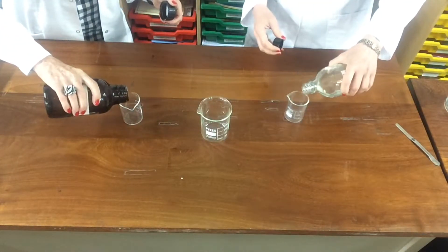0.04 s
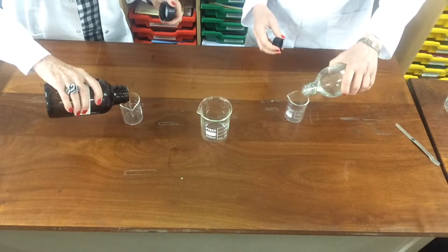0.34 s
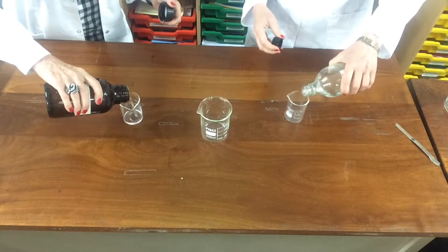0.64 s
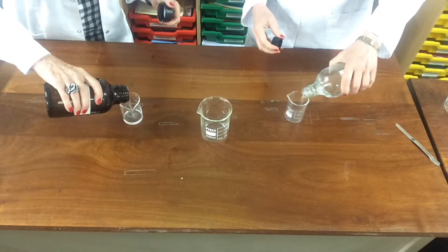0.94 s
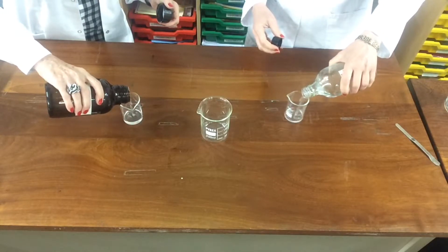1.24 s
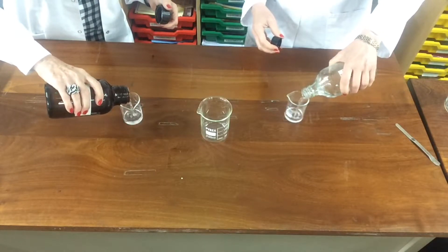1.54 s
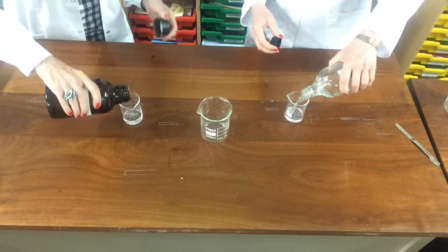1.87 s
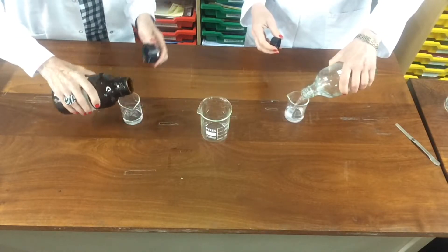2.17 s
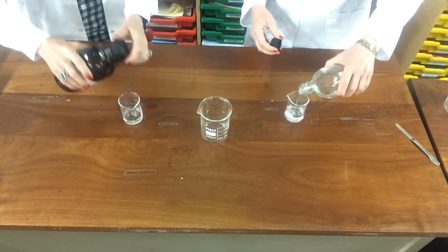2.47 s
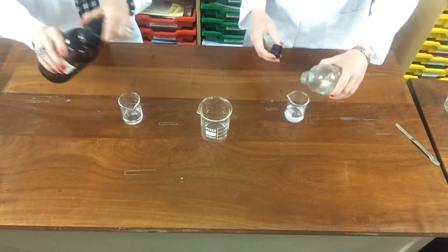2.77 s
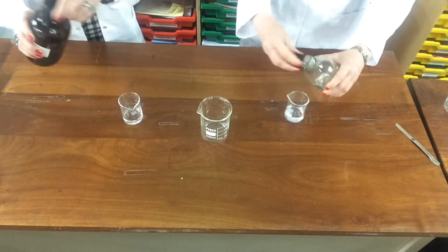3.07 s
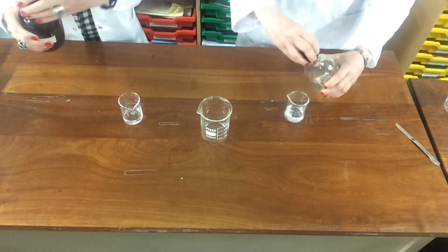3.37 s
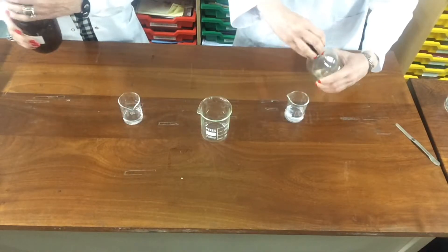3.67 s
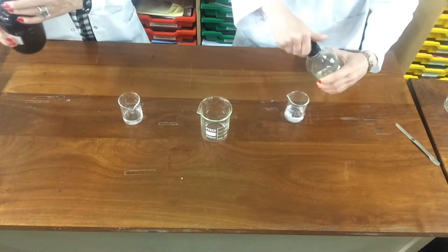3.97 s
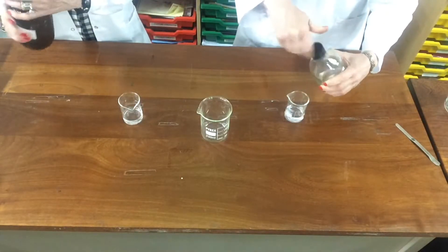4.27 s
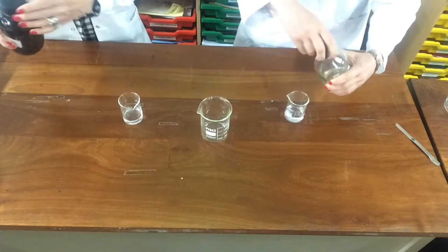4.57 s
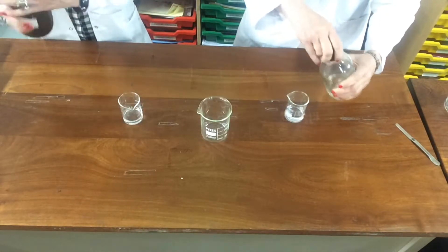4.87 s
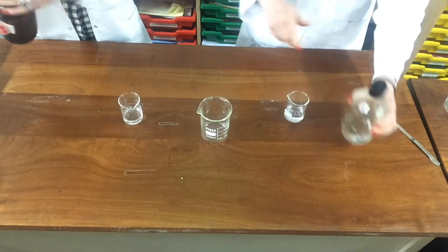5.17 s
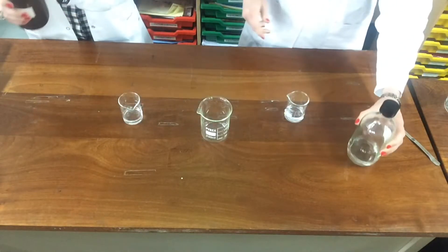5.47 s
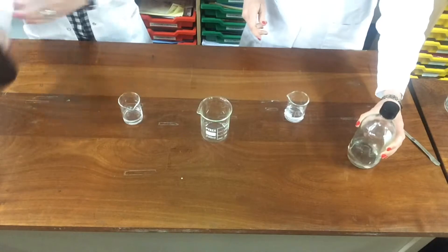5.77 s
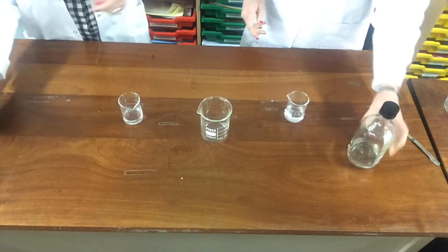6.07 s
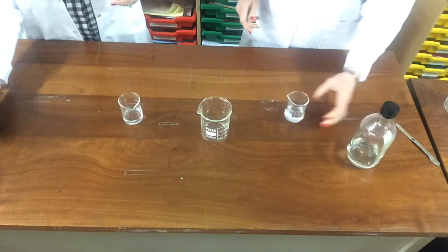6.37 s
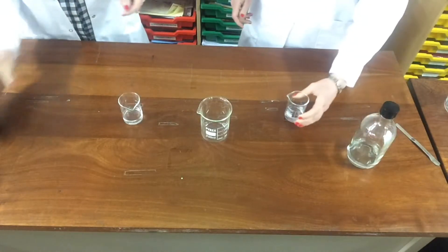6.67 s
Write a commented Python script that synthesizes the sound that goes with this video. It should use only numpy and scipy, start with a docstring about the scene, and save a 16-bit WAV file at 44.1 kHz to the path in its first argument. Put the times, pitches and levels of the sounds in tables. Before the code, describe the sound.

A faint low rumble and hiss fill a classroom lab with a short echo. From about 0.8 to 2.4 seconds, liquid trickles quietly from glass bottles into small beakers, with small splashes, a thin fizz and bubbly plinks, clearest around 1.7 seconds. From 2.4 to 3.7 seconds, plastic caps click and tap against the bottle necks, with brief scrapes and a few soft, hollow pops. Between 3.9 and 4.7 seconds a cap rubs on its thread, skidding on the glass with tiny squeaks and a stutter of bright snaps. A few light clicks follow just after 5 seconds. At 5.6 seconds a bottle lands on the wooden bench with a loud, resonant thud, leaving glassware ringing faintly. Another thud comes at 6.2 seconds, followed by a glassy tick and several quick knocks until about 6.5 seconds.

```python
"""Liquid poured from glass bottles into small beakers by two people at a wooden classroom lab bench.
Drops splash and trap air bubbles that plink; thin streams fizz. Plastic caps click on the necks, pop
and rub on their threads; one skids, squeaks and stutters on the glass. The bottles are set down with
thuds that ring the bench and nearby glassware. Short room echoes, low rumble and hiss lie beneath."""
import sys
import numpy as np
from scipy import signal
from scipy.fft import rfft, irfft
from scipy.io import wavfile
from scipy.ndimage import uniform_filter1d

SR = 44100
rng = np.random.default_rng(int(sys.argv[2]) if len(sys.argv) > 2 else 0)


def wav_out(sig):
    """Save sig, one row per channel (or a flat mono array), as 16-bit PCM at SR to the path in sys.argv[1]."""
    wavfile.write(sys.argv[1], SR, np.round(np.clip(np.atleast_2d(sig).T, -1, 1) * 32767).astype(np.int16))


N = 301070
TIME = np.arange(N) / SR
RING_TIME = np.arange(SR // 2) / SR
HZ = np.maximum(np.fft.rfftfreq(4096, 1 / SR), 1)


def amp(db):
    """Decibels to gain."""
    return 10 ** (np.asarray(db) / 20)


def unit_rms(x):
    """Scale to rms 1."""
    return x / np.sqrt(np.mean(x ** 2) + 1e-20)


def peak_rms(x):
    """Rms of the loudest 4 ms."""
    return np.sqrt(uniform_filter1d(x ** 2, 176).max() + 1e-20)


def unit_peak(x):
    """Scale the loudest 4 ms to rms 1."""
    return x / peak_rms(x)


def add(mix, start_s, sound):
    """Mix a sound in at start_s."""
    part = mix[max(round(start_s * SR), 0):][:len(sound)]
    part += sound[:len(part)]


def curve(points, hz=HZ):
    """Interpolate (Hz, value) points over log frequency."""
    point_hz, value = np.transpose(points)
    return np.interp(np.log(hz + 1), np.log(point_hz + 1), value)


def hump(hz, height_db, octaves=.12):
    """Resonant peak round hz, in dB over HZ."""
    return height_db / (1 + (np.log2(HZ / hz) / octaves) ** 2)


def colour(x, gain_db):
    """Minimum-phase filter, gain_db given over HZ."""
    log_gain = np.log(amp(np.maximum(gain_db, gain_db.max() - 100)))
    mirrored = np.concatenate([log_gain, log_gain[-2:0:-1]])
    taps = np.fft.ifft(np.exp(np.conj(signal.hilbert(mirrored)))).real
    return signal.oaconvolve(x, taps)[:len(x)]


def noise(spectrum):
    """Steady shaped noise, rms 1."""
    gain = amp(curve(spectrum, np.fft.rfftfreq(N, 1 / SR)))
    return unit_rms(irfft(rfft(rng.standard_normal(N)) * gain, N))


def ring(modes, spread_db):
    """Decaying modes; the place of the blow stirs each a little more or less."""
    hz, db, t60_s = np.transpose(modes)[:, :, None]
    weight = amp(db + spread_db * rng.standard_normal(db.shape)) * rng.choice([-1, 1], db.shape)
    return (weight * amp(-60 * RING_TIME / t60_s) * np.sin(2 * np.pi * hz * RING_TIME)).sum(0)


def crack(fall_s, scatter):
    """An impulse, then the dense, fast-dying shudder of the struck body."""
    shudder = rng.standard_normal(len(RING_TIME)) * np.exp(-RING_TIME / fall_s)
    return signal.unit_impulse(len(RING_TIME)) + scatter * shudder / np.linalg.norm(shudder)


def blips(rows, glide):
    """Brief tones that swell and die, drifting by the fraction glide in pitch."""
    out = np.zeros(N)
    for start_s, hz, db, swell_s in rows:
        age = RING_TIME / swell_s
        turns = np.cumsum(hz * (1 + glide * (np.tanh(age) - .5))) / SR
        swell = age * np.exp(-age ** 2 / 2)
        add(out, start_s, amp(db) * swell / swell.max() * np.sin(2 * np.pi * turns))
    return out


# Room noise spectra. Each row: frequency in Hz, relative density in dB.
RUMBLE_SPECTRUM = [(12, -39), (20, -17.5), (81, -0.5), (142, -10), (301, -18), (590, -27.5), (1030, -31.5),
                   (2020, -40), (2320, -82), (2820, -73), (16000, -48.5)]
HISS_SPECTRUM = [(150, -27), (400, 7), (1000, 2.5), (2000, 1), (4000, -4.5), (7500, -8), (10000, -12),
                 (15000, -16.5)]
# Slow drift of the rumble's bass and of the hiss. Each row: time in seconds, gain in dB.
BASS_DRIFT = [(0, -3), (.9, 1.6), (4.5, -2.5), (5.3, -7), (6.83, -5.5)]
HISS_DRIFT = [(0, -76), (1.3, -76.5), (2.25, -65), (3.6, -69.5), (4.8, -66.5), (6.83, -65)]

def background(rumble_db=-60.5, waver_db=3, bass_hz=170, hum_hz=299, hum_db=-72):
    """Lumpy room rumble, a faint hum, and a hiss that grows late in the pouring."""
    knots_s = np.arange(0, N / SR + 1, 0.1)
    lumps_db = waver_db * np.interp(TIME, knots_s, rng.standard_normal(len(knots_s)))
    bass_gain = amp(lumps_db + np.interp(TIME, *np.transpose(BASS_DRIFT)))
    steady = noise(RUMBLE_SPECTRUM)
    bass = signal.sosfiltfilt(signal.butter(2, bass_hz, fs=SR, output="sos"), steady)
    rumble = amp(rumble_db) * (steady - bass + bass_gain * bass)
    hum = amp(hum_db) * np.sin(2 * np.pi * hum_hz * TIME)
    hiss = amp(np.interp(TIME, *np.transpose(HISS_DRIFT))) * noise(HISS_SPECTRUM)
    return rumble + hum + hiss


# Tick of a splash or a cap contact. Each row: frequency in Hz, gain in dB.
TICK_SPECTRUM = [(100, -33), (300, -6), (700, 0.5), (1300, 3.5), (2200, 0), (4200, 2.5), (5500, -4.5),
                 (8200, -2), (11000, -8.5), (15500, -20)]
# Drops. Each row: start in seconds, bubble pitch in Hz, bubble level in dB, splash level in dB.
BEAKER_DROPS = [(.836, 5340, -45.5, -58), (0.836, 4080, -53, -62), (.891, 9420, -49, -68),
                (.900, 5400, -50.5, -55), (1.033, 3240, -53.5, -69), (1.049, 2980, -55, -61),
                (1.38, 2910, -56.5, -61), (1.471, 6760, -72, -61), (1.513, 2050, -42, -52.5),
                (1.539, 1820, -53, -48.5), (1.565, 2060, -63, -56), (1.656, 11800, -53, -65),
                (1.662, 1201, -31, -51), (1.684, 1260, -33.5, -50), (1.695, 6360, -54.5, -75),
                (1.852, 5670, -56.5, -76), (2.014, 1260, -44.5, -58), (2.051, 5640, -49.5, -60)]

def drops(swell_1khz_s=0.004, swell_law=0.43, air_hz=672, air_swell_s=0.0062, air_db_per_octave=-8):
    """Each drop slaps the liquid and traps a bubble; big, low drops stir the beaker's air most."""
    splashes = np.zeros(N)
    bubbles, beaker_air = [], []
    for start_s, hz, bubble_db, splash_db in BEAKER_DROPS:
        wet_db = curve(TICK_SPECTRUM) + hump(hz, height_db=17, octaves=0.94)
        slap = colour(crack(fall_s=0.0045, scatter=2.2), wet_db)
        add(splashes, start_s, amp(splash_db) * unit_peak(slap))
        bubbles.append((start_s, hz, bubble_db, swell_1khz_s * (1000 / hz) ** swell_law))
        air_db = splash_db + 5 + air_db_per_octave * np.log2(hz / air_hz)
        beaker_air.append((start_s, air_hz, air_db, air_swell_s))
    return splashes + blips(bubbles + beaker_air, glide=0.021)


def spray(delay_s=.022, low_hz=2600, high_hz=12500, relative_db=-7, swell_cycles=8, count=3):
    """Each splash throws up tiny bubbles that ping just after it."""
    bubbles = []
    for start_s, _, _, splash_db in BEAKER_DROPS:
        wait, size = rng.random((count, 2)).T
        times_s = start_s - delay_s * np.log(1 - wait)
        hz = low_hz * (high_hz / low_hz) ** size
        bubbles += zip(times_s, hz, np.full(count, splash_db + relative_db), swell_cycles / hz)
    return blips(bubbles, glide=0.13)


# Thin streams. Each row: start and end in seconds, bubbles per second, minimum bubble level in dB.
POUR_STREAMS = [(0.843, 1.095, 60, -66.5), (1.469, 1.878, 200, -72.5), (1.909, 2.408, 83, -67)]

def fizz(low_hz=2300, high_hz=14500, swell_cycles=6, spread_db=4):
    """Streams fold in tiny bubbles; the smaller, the higher and shorter."""
    bubbles = []
    for start_s, end_s, per_s, floor_db in POUR_STREAMS:
        length_s = end_s - start_s
        count = max(int(per_s * length_s), 1)
        when, size, strength = rng.random((count, 3)).T
        hz = low_hz * (high_hz / low_hz) ** size
        db = floor_db + spread_db * np.minimum(-np.log(1 - strength), 3)
        bubbles += zip(start_s + when * length_s, hz, db, swell_cycles / hz)
    return blips(bubbles, glide=0.2)


def glass_contacts(rows, modes, ring_db, fall_s, scatter, hump_db, cavity_db):
    """A tick coloured by the cap rings the glass, then rebounds. Harder means more treble, less body."""
    out = np.zeros(N)
    for start_s, db, hardness_db, hz in rows:
        direct = crack(fall_s, scatter)
        blow = direct.copy()
        add(blow, .0013, 0.053 * direct)  # reflection off the bench
        shelves = [(600, -14 - hardness_db), (1100, 0), (4500, 0), (8500, hardness_db)]
        tick = unit_peak(colour(blow, curve(TICK_SPECTRUM) + curve(shelves) + hump(hz, hump_db)))
        cap_cavity = (hz, cavity_db, 0.028)  # t60 in seconds
        vessel = ring(modes + [cap_cavity], spread_db=3)
        add(out, start_s, amp(db) * unit_peak(tick + amp(ring_db) * vessel))
        rebound_s = .012 * rng.uniform(.8, 1.2)
        add(out, start_s + rebound_s, amp(db - 15) * tick)
    return out


# Bottle modes. Each row: frequency in Hz, relative level in dB, t60 in seconds.
BOTTLE_MODES = [(1372, -19, 0.16), (1907, -9, 0.059), (2090, -23, 0.06), (2700, -34, 0.26),
                (3166, -9.5, 0.025), (4340, -20.5, 0.086), (4770, -27.5, 0.04), (5740, -41, 0.36)]
# Clicks. Each row: start in seconds, level in dB, hardness in dB, main pitch in Hz.
NECK_CLICKS = [(2.0145, -46.5, -29, 1370), (2.4282, -47, -15, 2700), (2.4395, -41.5, -16, 2250),
               (2.458, -41.5, -13, 2240), (2.4909, -36.5, -9, 2070), (2.595, -48, 10, 1360),
               (2.6442, -36.5, -11.5, 1820), (2.9548, -29, -10.5, 1937), (3.1598, -33, 4, 2470),
               (3.2102, -41, 0.5, 2300), (3.3159, -46, 7, 3470), (3.3247, -40, 1.5, 1840),
               (3.4177, -53.5, 4, 1470), (3.5005, -36.5, -5, 1370), (3.530, -43.5, -14.5, 1396),
               (3.6908, -38.5, -4, 2410), (3.7112, -25, -8.5, 1927), (4.6749, -40.5, -14, 1840),
               (5.0178, -46, -12, 2350), (5.2338, -41, -5.5, 4810), (5.2617, -46.5, -4, 4900)]

def clicks():
    """A cap or a beaker's rim strikes a bottle neck."""
    return glass_contacts(NECK_CLICKS, BOTTLE_MODES, ring_db=0, fall_s=0.0037, scatter=2.1,
                          hump_db=8.5, cavity_db=-1)


# Air pops. Each row: start in seconds, pitch in Hz, peak level in dB.
CAP_POPS = [(2.015, 340, -43.5), (2.617, 203, -36.5), (2.644, 230, -42), (3.222, 179, -46.5),
            (3.71, 173, -42)]

def pops(swell_cycles=1.08):
    """A sealing cap lets a puff of air out of the neck: a low, falling blip."""
    return blips([(start_s, hz, db, swell_cycles / hz) for start_s, hz, db in CAP_POPS], glide=-0.12)


# Air resonances of the neck. Each row: open and covered pitch in Hz, peak level in dB,
# then time to peak, rise and fall in seconds.
NECK_MODES = [(289, 194, -43.5, 0.059, 0.11, 0.014), (1475, 1368, -30, 0.072, 0.012, 0.013)]

def neck_air(start_s=2.438, close_s=0.079, attack_s=0.0037):
    """The air in the bottle sings downward as the cap slides over its mouth."""
    out = np.zeros(N)
    covered = np.minimum(RING_TIME / close_s, 1)
    attack = np.minimum(RING_TIME / attack_s, 1)
    for open_hz, covered_hz, db, peak_s, rise_s, fall_s in NECK_MODES:
        hz = open_hz + (covered_hz - open_hz) * covered
        swell = np.exp(np.minimum((RING_TIME - peak_s) / rise_s, (peak_s - RING_TIME) / fall_s))
        add(out, start_s, amp(db) * attack * swell * np.sin(2 * np.pi * np.cumsum(hz) / SR))
    return out


# Glass modes under rubs and snaps. Each row: frequency in Hz, relative level in dB, t60 in seconds.
GLASS_MODES = [(1973, -14, 0.053), (3220, -5, 0.048), (5360, -19, 0.043), (6380, -6, 0.074),
               (7800, -27, 0.1), (8240, -11.5, 0.058), (15100, -59, .08)]
# Friction spectrum. Each row: frequency in Hz, gain in dB.
RUB_SPECTRUM = [(200, -20), (700, 0.5), (1300, 5), (2300, 7), (3300, 2), (4500, 6), (6800, -6.5),
                (8200, -1.5), (10500, -6), (13000, -16.5), (15000, -9)]
# Strokes. Each row: peak time in seconds, level in dB, rise and fall in seconds, main pitch in Hz.
RUB_STROKES = [(2.505, -44, 0.024, 0.019, 2100), (2.624, -49.5, 0.03, 0.022, 1930),
               (3.91, -55, 0.057, 0.053, 2330), (4.019, -45.5, .024, .022, 2400),
               (4.15, -58.5, 0.065, .029, 3430), (4.286, -31.5, 0.0019, 0.025, 7950),
               (4.37, -49.5, 0.021, 0.065, 7840), (4.677, -45, 0.0016, 0.015, 1880),
               (5.012, -55, 0.032, 0.043, 1400), (5.015, -60, 0.048, .08, 13400),
               (6.234, -62.5, 0.057, .025, 7800)]

def rubs(slips_per_s=5000, grain_db=4, ring_db=-12, flat_hz=4000, lead_s=.5):
    """A cap or hand slides on a bottle: tiny slips pass through a resonance and ring the glass."""
    out = np.zeros(N)
    t = np.arange(SR) / SR - lead_s
    for peak_s, db, rise_s, fall_s, hz in RUB_STROKES:
        tilt_db_per_octave = 1.6 * np.log2(hz / flat_hz)  # faster rubs are higher and brighter
        resonance_db = hump(hz, height_db=11, octaves=0.13)
        tone_db = curve(RUB_SPECTRUM) + tilt_db_per_octave * np.log2(HZ) + resonance_db
        stroke = np.exp(np.minimum(t / rise_s, -t / fall_s))
        sizes = rng.choice([-1, 1], SR) * amp(grain_db * np.minimum(rng.exponential(1, SR), 4))
        slips = sizes * (rng.random(SR) < slips_per_s / SR)
        scrape = stroke * unit_rms(colour(slips, tone_db))
        singing = unit_rms(signal.oaconvolve(scrape, ring(GLASS_MODES, spread_db=1))[:SR])
        add(out, peak_s - lead_s, amp(db) * (scrape + amp(ring_db) * scrape.std() * singing))
    return out


# Snaps. Each row: start in seconds, level in dB, hardness in dB, main pitch in Hz.
GLASS_SNAPS = [(4.285, -29.5, 5.5, 14800), (4.3521, -36.5, 1, 7700), (4.3656, -31, -4.5, 3380),
               (4.5013, -33.5, -2, 3930), (4.504, -33, -4.5, 2020), (6.280, -38.5, 6, 12700),
               (6.282, -35.5, 0, 5100)]

def snaps(stutter_s=4.3774, gap_s=.0428, quicken_s=.0133, first_db=-37, hardness_db=-9, hz=3450):
    """Hard, bright snaps on glass; the skidding cap stutters to rest, each snap sooner and weaker."""
    stutter = []
    for k in range(4):
        start_s = stutter_s + gap_s * k - quicken_s * k * (k - 1) / 2
        stutter.append((start_s, first_db - 3 * k, hardness_db, hz))
    return glass_contacts(GLASS_SNAPS + stutter, GLASS_MODES, ring_db=-4, fall_s=0.0017, scatter=1.25,
                          hump_db=10, cavity_db=-12)


# Squeaks. Each row: start in seconds, pitch in Hz, peak level in dB, swell time in seconds.
SKID_SQUEAKS = [(4.287, 6000, -38, 0.012), (4.36, 3470, -47, 0.029), (4.503, 6370, -47, 0.0058)]

def squeaks():
    """The glass squeaks under the skidding cap."""
    return blips(SKID_SQUEAKS, glide=-0.012)


# Bench top modes. Each row: frequency in Hz, relative level in dB, t60 in seconds.
BENCH_MODES = [(98, -1.5, 0.29), (122.6, -10, 0.21), (149.5, -6.5, 0.43), (212, -13, 0.2),
               (250.5, -16, 0.46), (283.6, -17, 0.4), (330, -10, 0.48), (390, -8, 0.42), (439, -18.5, 0.46),
               (484.6, -6, 0.32), (506, -26, 0.53), (634.7, 0.5, 0.13), (675, -44, 0.28), (790, 1.5, 0.1),
               (860, -29, 0.16), (978, -38, 0.27), (1107, -36, .22), (1152, -16, 0.2)]
# Knock of glass on wood. Each row: frequency in Hz, gain in dB.
KNOCK_SPECTRUM = [(40, 8.5), (90, 5.5), (300, 2.5), (700, -1), (1400, 1.5), (2200, 1.5), (4000, 6.5),
                  (8000, 6.5), (16000, 10)]
# Landings. Each row: start in seconds, level in dB, low cutoff in Hz.
BOTTLE_LANDINGS = [(5.5677, -17, 177), (6.169, -16, 88), (6.225, -29.5, 200), (6.391, -35.5, 170),
                   (6.415, -24, 97), (6.4485, -20, 179)]

def thuds(ring_db=-6, full_blow_hz=1305, contact_law=0.31, far_edge_s=.0066, far_edge_db=-6):
    """A bottle lands on one edge, then the other: dull knocks and the boom of the bench's low modes."""
    knocks, booms = np.zeros((2, N))
    for start_s, db, low_hz in BOTTLE_LANDINGS:
        high_hz = full_blow_hz * amp(db) ** contact_law  # weaker blows are slower, so duller
        band_db = -10 * np.log10((1 + (low_hz / HZ) ** 6) * (1 + (HZ / high_hz) ** 6))
        for edge_s, edge_db in ((start_s, db), (start_s + far_edge_s, db + far_edge_db)):
            knock = unit_peak(colour(crack(fall_s=0.014, scatter=2), band_db + curve(KNOCK_SPECTRUM)))
            boom = amp(ring_db) * colour(ring(BENCH_MODES, spread_db=3), band_db)
            gain = amp(edge_db) / peak_rms(knock + boom)
            add(knocks, edge_s, gain * knock)
            add(booms, edge_s, gain * boom)
    return knocks, booms


def glassware(start_s=5.568, hz=1326, db=-57, t60_s=2.7):
    """Glassware on the bench, shaken by the first thud, rings on faintly."""
    age_s = np.maximum(TIME - start_s, 0)
    return amp(db - 60 * age_s / t60_s) * np.sin(2 * np.pi * hz * age_s)


# Classroom decay. Each row: frequency in Hz, t60 in seconds.
ROOM_DECAY = [(100, 0.64), (300, 0.56), (1000, 0.6), (2500, 0.43), (6000, 0.4), (15000, 0.22)]

def room(x, build_s=0.002):
    """Echoes build up quickly and die sooner in the treble."""
    t = np.arange(SR) / SR
    build = 1 - np.exp(-(t / build_s) ** 2)
    reflections = rng.choice([-1., 1.], SR) * (rng.random(SR) < 0.1) * build
    hz, frame_s, spectra = signal.stft(reflections, SR, nperseg=256)
    decay = amp(-60 * frame_s / curve(ROOM_DECAY, hz)[:, None])
    tail = signal.istft(spectra * decay, SR, nperseg=256)[1]
    return signal.oaconvolve(x, tail / np.linalg.norm(tail))[:N]


def scene():
    """Pouring, capping and setting down in one room, mono."""
    pouring = drops() + spray() + fizz()
    caps = clicks() + snaps() + rubs() + squeaks() + neck_air() + pops()
    knocks, booms = thuds()
    echoes = room(amp(-6.5) * pouring + amp(-11) * caps + amp(-7.5) * knocks)
    return (pouring + caps + knocks + booms + glassware() + echoes + background())[None]


def record(dry):
    """Steep low-pass at 16.2 kHz."""
    taps = signal.firwin(511, 16200, window=("kaiser", 9), fs=SR)
    return signal.oaconvolve(dry, taps[None], "same")


dry = scene()
out = record(dry)
wav_out(out)
```